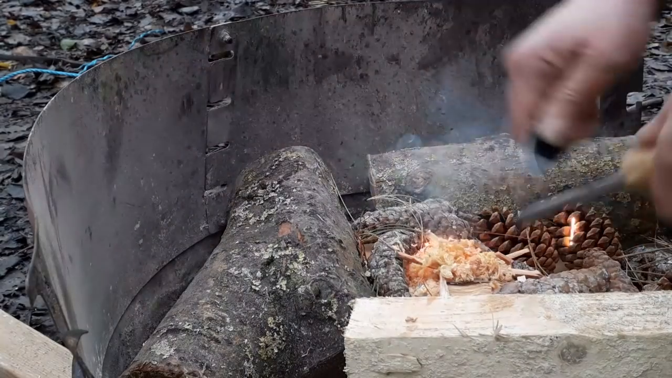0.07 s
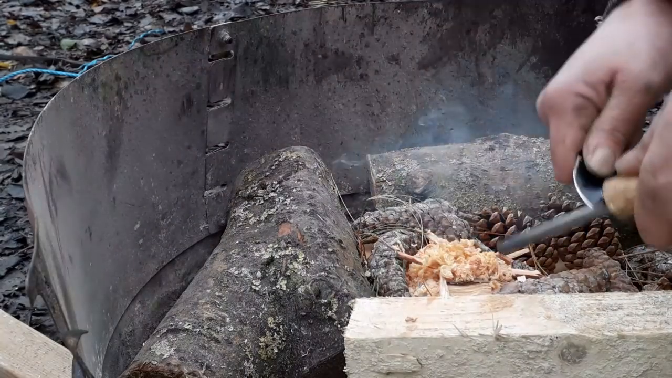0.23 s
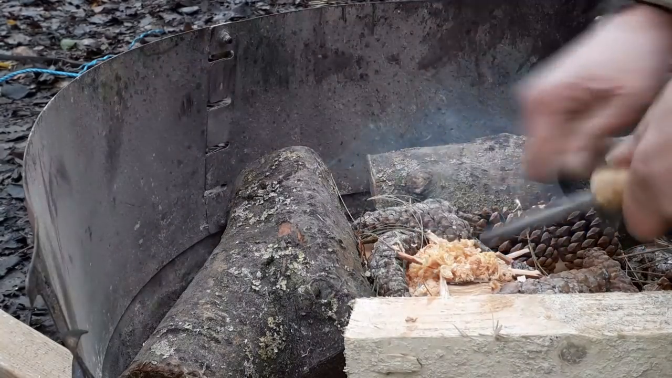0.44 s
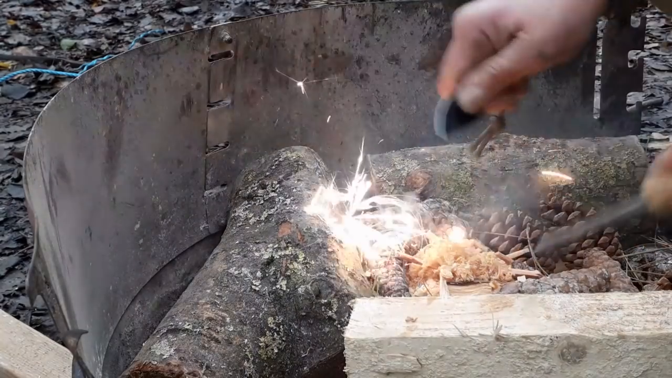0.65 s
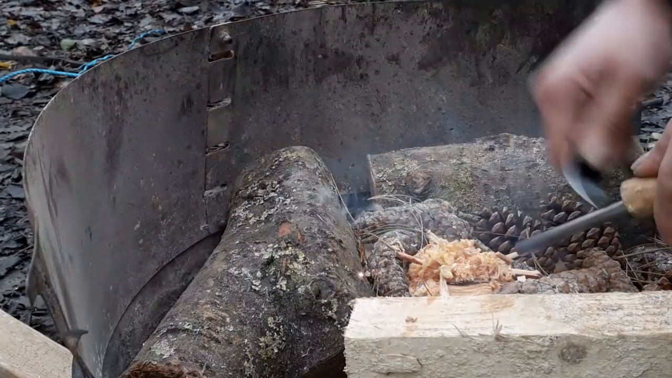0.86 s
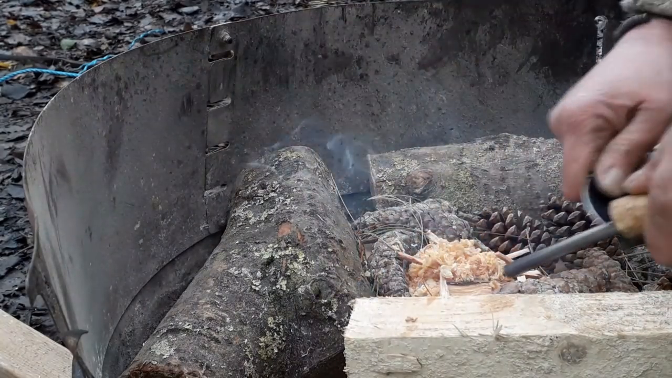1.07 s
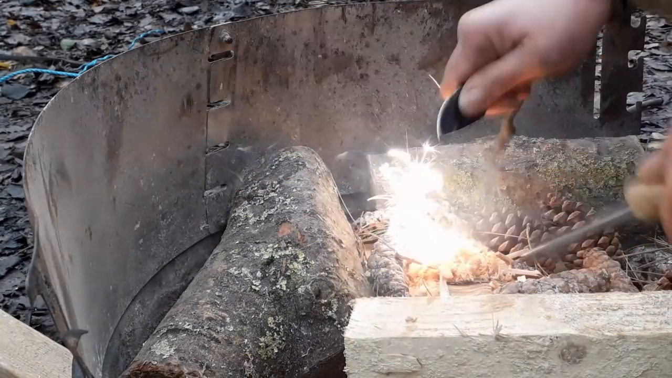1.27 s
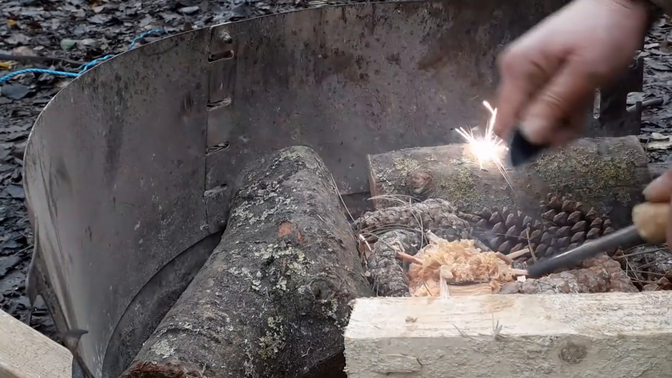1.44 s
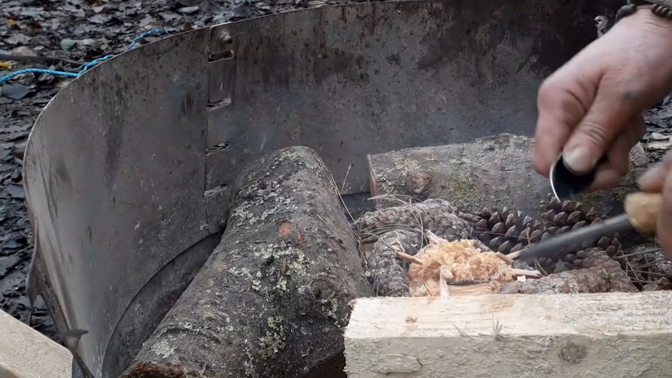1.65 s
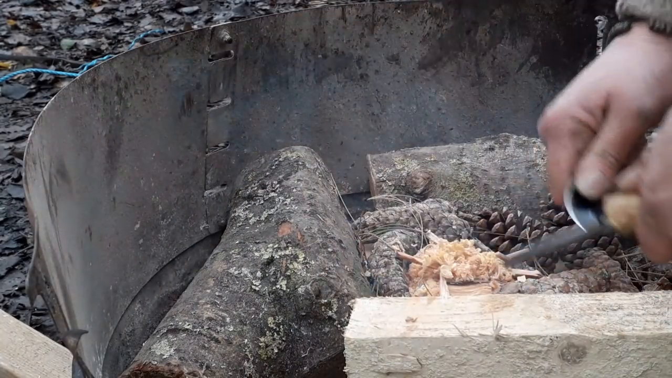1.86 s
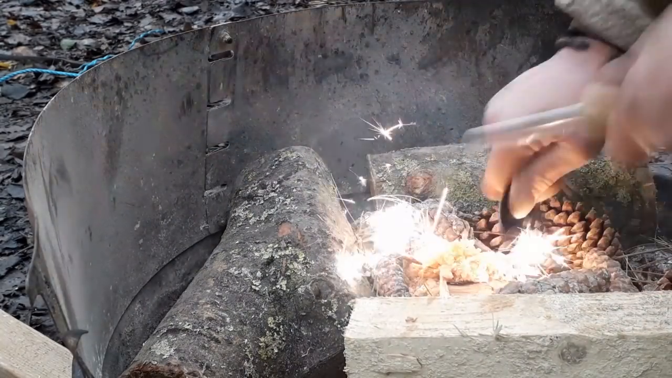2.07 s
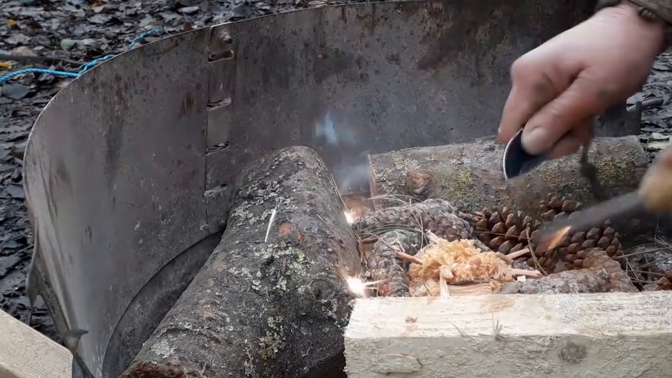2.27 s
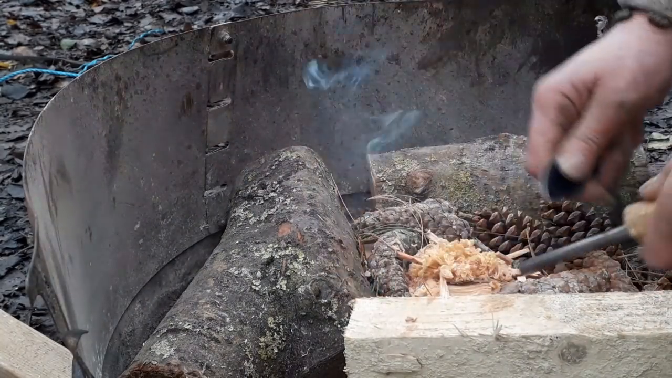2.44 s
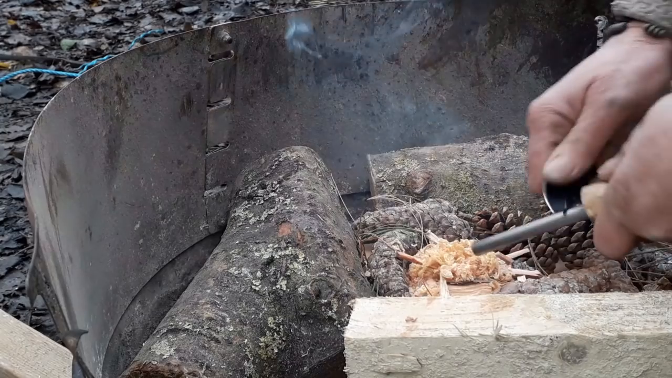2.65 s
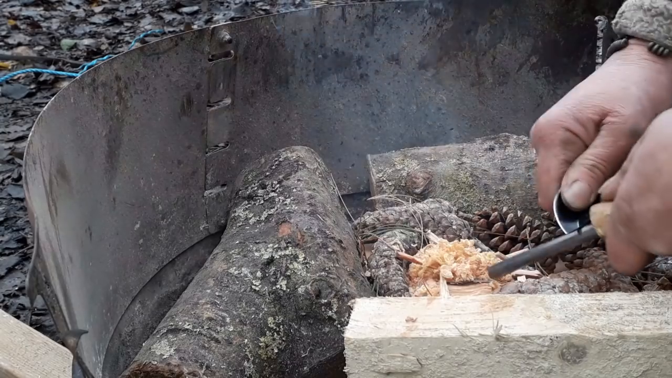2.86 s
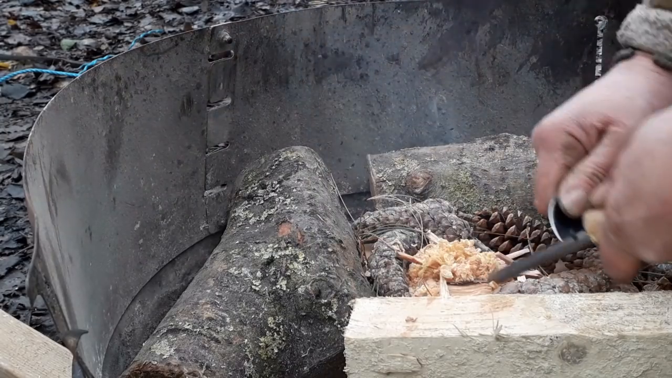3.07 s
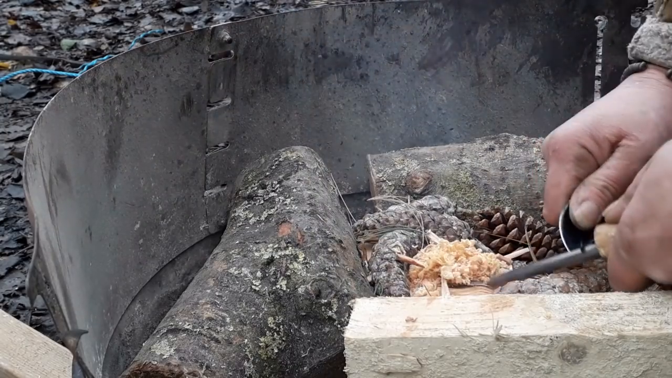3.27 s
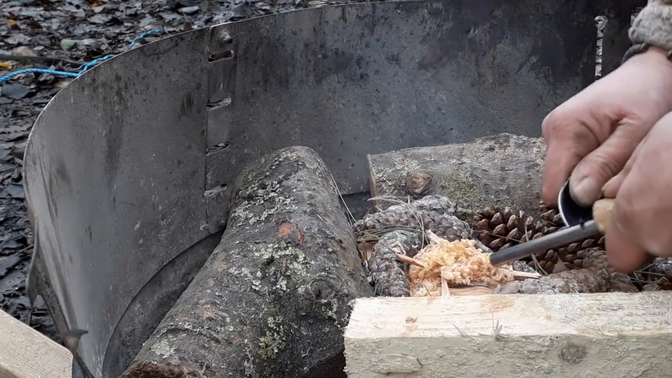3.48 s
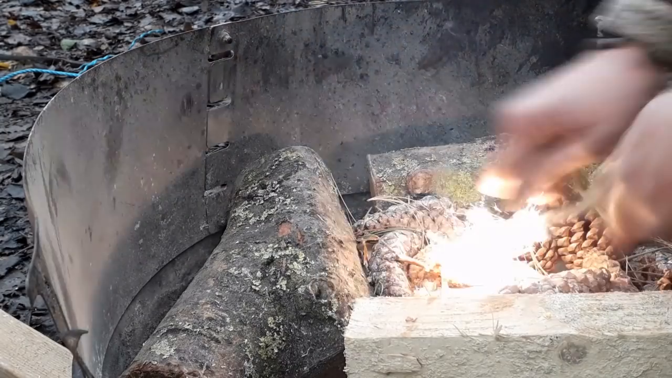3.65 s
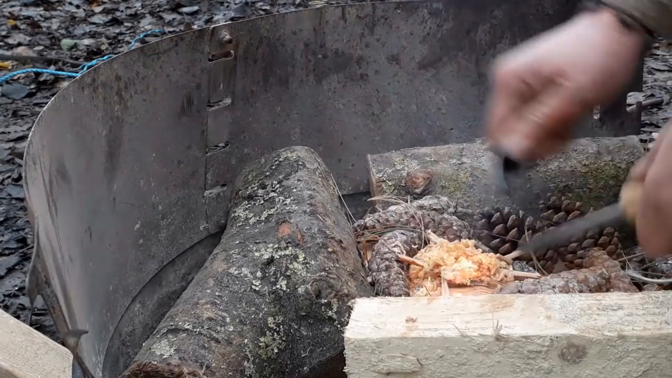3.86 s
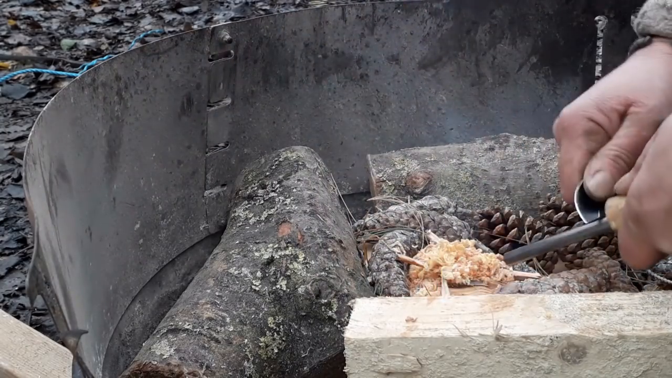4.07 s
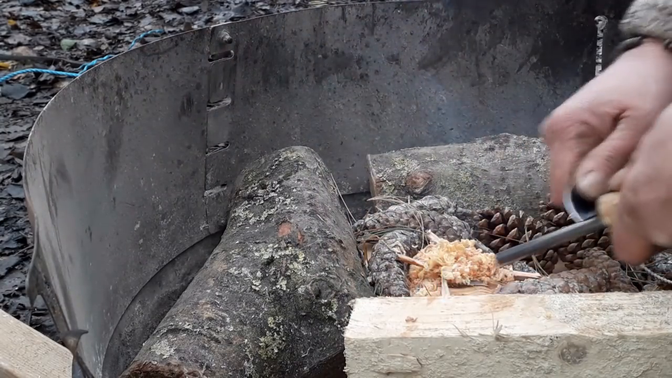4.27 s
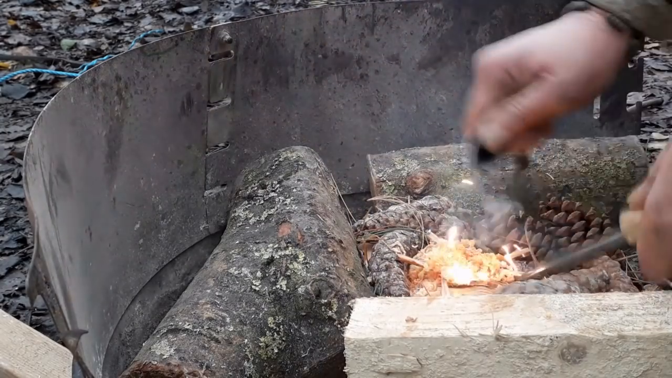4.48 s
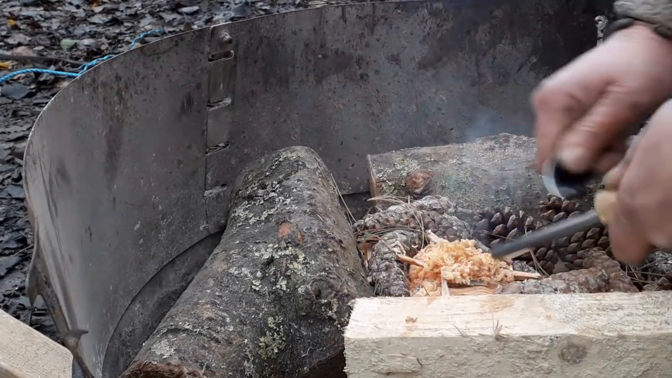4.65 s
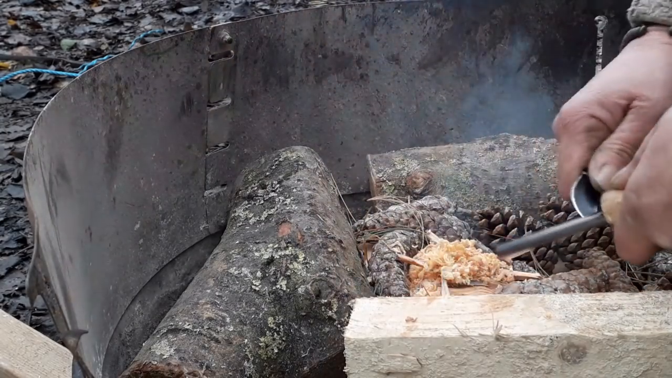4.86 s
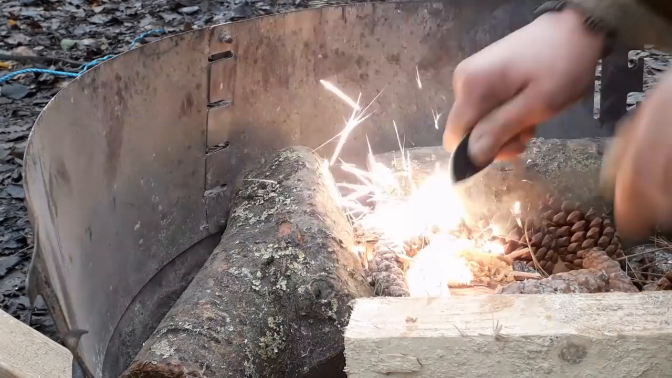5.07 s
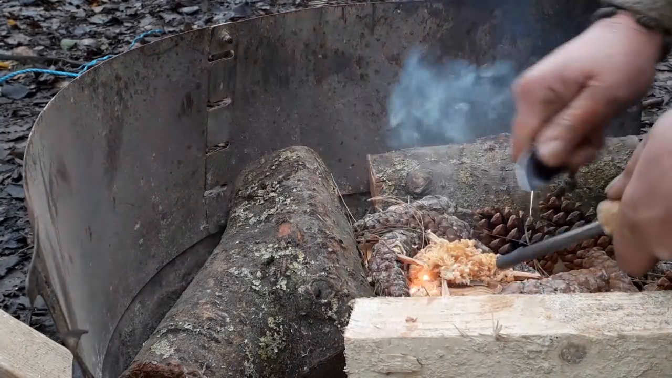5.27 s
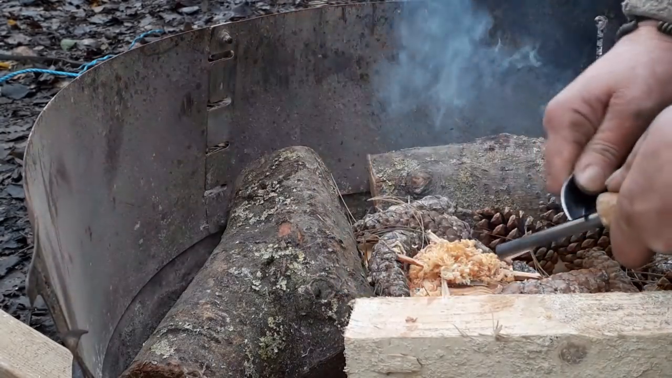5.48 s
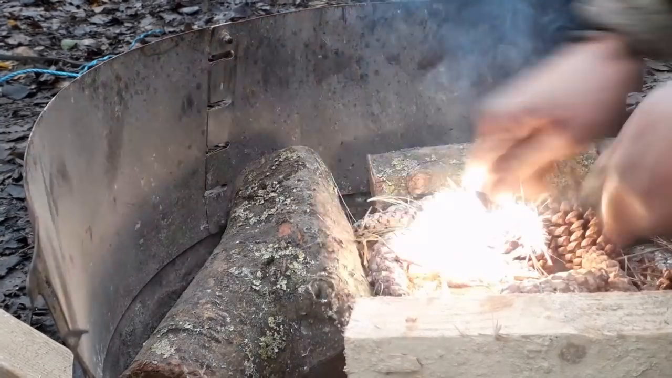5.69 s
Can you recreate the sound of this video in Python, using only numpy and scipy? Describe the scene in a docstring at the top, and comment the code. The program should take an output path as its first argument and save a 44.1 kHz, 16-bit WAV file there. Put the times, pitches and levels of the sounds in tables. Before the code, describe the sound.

Six quick gritty metal scrapes, each flaring into crackling, fizzing sparks, with sharp steel ticks between them and a faint far engine hum outdoors.

```python
"""Outdoors, over tinder in a metal fire bowl, a steel blade is driven down a ferro rod six times.
The blade lands on the rod with ticks: a rough snap of noise plus ringing steel tones.
Each stroke rasps (filtered grit), screeches (two falling tones) and ends with a dull knock of the rod.
The shavings flare, sizzle and pop as swells and short bursts of grit, and embers hiss on.
Behind it lie a steady rush of filtered noise and a far engine, a low note that slowly gains speed."""
import sys
import numpy as np
from scipy import signal
from scipy.fft import rfft, irfft, next_fast_len
from scipy.io import wavfile

SR = 44100
rng = np.random.default_rng(int(sys.argv[2]) if len(sys.argv) > 2 else 0)


def file_out(sig):
    """Save sig as 16-bit WAV at sys.argv[1]."""
    # one column per channel
    cols = np.atleast_2d(sig).T
    # limit, then scale
    lim = np.clip(cols, -1, 1)
    pcm = np.round(lim * 32767).astype(np.int16)
    wavfile.write(sys.argv[1], SR, pcm)


N = 252252
T = np.arange(N) / SR  # time in seconds


def undb(db):
    """Turn decibels into gain."""
    return 10 ** (np.asarray(db) / 20)


def unit(x):
    """Scale a sound to an rms of 1."""
    return x / np.sqrt(np.mean(x ** 2))


def colour(x, points):
    """Filter through (Hz, dB) points without any sound arriving early (minimum phase)."""
    hz, db = np.transpose(points)
    size = next_fast_len(2 * N)
    bin_hz = np.arange(size // 2 + 1) * SR / size + 1
    log_gain = np.log(undb(np.interp(np.log(bin_hz), np.log(hz), db)))
    # folding the cepstrum onto positive times makes the filter causal
    cepstrum = irfft(log_gain, size)
    cepstrum[1:size // 2] *= 2
    cepstrum[size // 2 + 1:] = 0
    response = np.exp(rfft(cepstrum))
    return irfft(rfft(x, size) * response, size)[:N]


def walk(rate):
    """Drift at random with spread 1, along straight lines between `rate` random points a second."""
    knots = rng.standard_normal(8192)
    return unit(np.interp(T * rate, np.arange(len(knots)), knots))


def grit(rate, spread_db):
    """Make dense tiny fractures, `rate` a second, a few much larger than the rest."""
    hits = rng.random(N) < rate / SR
    size = undb(spread_db * np.minimum(rng.exponential(size=N), 4))
    return unit(hits * size * rng.choice([-1, 1], N))


def swell(at, rise, fall):
    """Rise roundly to 1 at the given second, then fall with a longer tail."""
    before, after = np.maximum(at - T, 0), np.maximum(T - at, 0)
    return np.exp(-(before / rise) ** 2 - (after / fall) ** 1.066)


def ringing_down(age, t60):
    """Fade by 60 dB over t60 seconds."""
    return np.exp(-np.log(1000) * age / t60)


def shifting(x, spread_db=1.5, rate=110):
    """The moving contact favours now one band of the rod, now another."""
    hz = np.arange(N // 2 + 1) * SR / N
    centres = [0, 1500, 2300, 3100, 4000, 5000, 6200, 7600, 11000]  # Hz
    spectrum = rfft(x)
    total = np.zeros(N)
    for share in np.eye(len(centres)):
        band = irfft(spectrum * np.interp(hz, centres, share), N)
        total += band * undb(spread_db * walk(rate))
    return unit(total)


# Tone of the outdoor rush. Each row: frequency in Hz, strength in dB per Hz (only the shape counts).
RUSH_SPECTRUM = [(15, -78.5), (25, -38), (46, -22), (65, -7), (80, -8), (110, -7), (200, -8), (300, -12),
                 (400, -15), (520, -21), (890, -10.5), (1150, -13), (1400, -17), (2620, -25.5),
                 (4770, -45.5), (7500, -49), (9750, -68.5), (16500, -100)]
# Rise and fall of the rush. Each row: time in seconds, level in dB (only differences from the median count).
RUSH_LEVEL = [(0.0, -40.5), (0.29, -40.5), (2.15, -41.5), (2.56, -44), (3.86, -41), (5.72, -41.5)]


def outdoors(rush_db=-38.5, hiss_db=-72.5):
    """A broad distant rush of noise wavers a little over a faint even hiss."""
    rush = unit(colour(rng.standard_normal(N), RUSH_SPECTRUM))
    seconds, db = np.transpose(RUSH_LEVEL)
    drift_db = np.interp(T, seconds, db - np.median(db)) + .5 * walk(9.8)
    return rush * undb(rush_db + drift_db) + undb(hiss_db) * rng.standard_normal(N)


# The engine speeds up ever faster: firing rate at first, its gain after one second, bend of the rise.
ENGINE_HZ, ENGINE_GAIN_HZ, ENGINE_BEND = 146.7, .76, 1.8
FAR_TONE_HZ = 354.3
# Loudness of the far engine. Each row: time in seconds, level of its main note in dB.
ENGINE_LEVEL = [(0, -49.5), (1.85, -38), (3.2, -41.5), (4, -43), (5.72, -43.5)]
# A faint far tone that comes and goes. Each row: middle in seconds, half length in seconds, peak level in dB.
FAR_TONE_TIMES = [(.72, .24, -50), (3.61, 0.16, -45), (4.13, 0.15, -46.5), (4.67, 0.17, -47.5)]


def distance():
    """The far engine's firing note has weak octaves below and above; a faint steady tone comes and goes."""
    seconds, db = np.transpose(ENGINE_LEVEL)
    hz = ENGINE_HZ + ENGINE_GAIN_HZ * T ** ENGINE_BEND
    phase = 2 * np.pi * np.cumsum(hz * (1 + 0.0018 * walk(13))) / SR
    note = np.sin(phase) + undb(-15) * np.sin(phase / 2) + undb(-22.5) * np.sin(2 * phase)
    level = undb(np.interp(T, seconds, db) + 0.56 * walk(8))
    engine = np.sqrt(2) * level * note  # the root makes the level an rms value
    presence = np.zeros(N)
    for at, half, tone_db in FAR_TONE_TIMES:
        presence += undb(tone_db) * np.exp(-((T - at) / half) ** 2)
    return engine + presence * np.sin(2 * np.pi * FAR_TONE_HZ * T) * undb(2.0 * walk(20))


# After every stroke the scattered shavings sizzle out; the fizz is relative to the level.
AFTERGLOW_DB, AFTERGLOW_FIZZ_DB = -47.5, -4
AFTERGLOW_DELAY_S, AFTERGLOW_RISE_S, AFTERGLOW_FALL_S = 0.053, .025, 0.081
# Small sparks burst at random once they have flown a while; the rate is for the height of each swell.
STRAY_PER_S, STRAY_DB, STRAY_FIZZ_DB, STRAY_SCATTER_DB = 45, -49, -5, 6.5
STRAY_FLIGHT_S, STRAY_RISE_S, STRAY_FALL_S = .18, 0.031, .08
# Tone of the burning fizz. Each row: frequency in Hz, strength in dB per Hz (only the shape counts).
FIZZ_SPECTRUM = [(2000, -24.5), (5000, 4), (8000, 6.5), (11500, 1), (14000, -2.5), (16000, -2)]
# Tone of a soft puff of hot air. Each row: frequency in Hz, strength in dB per Hz (only the shape counts).
PUFF_SPECTRUM = [(60, -31.5), (180, 2.5), (420, -3.5), (750, -4), (1300, -6), (2500, -9.5), (5000, -17.5)]
# Clumps of shavings flaring up.
# Each row: peak in seconds, level in dB, rise in seconds, fall in seconds, fizz in dB against the level.
FLARE_TIMES = [(0.0126, -27.5, 0.0019, 0.0071, -15), (.035, -48.5, 0.044, 0.055, -7),
               (.659, -31, 0.0087, 0.016, -3.5), (.712, -43, 0.016, .02, -6),
               (1.32, -34, 0.023, 0.011, 1.5), (1.376, -43, .012, 0.015, 3.5),
               (2.134, -37, 0.0069, .016, 6), (2.185, -30.5, 0.03, 0.03, 0.5),
               (2.365, -50.5, 0.012, 0.056, -4.5), (3.796, -31.5, 0.0022, 0.0051, -0.5),
               (3.837, -34, 0.0066, .007, 2), (4.514, -46, 0.0026, 0.011, 13.5),
               (5.142, -38, 0.017, 0.0096, -0.5)]
# Single short bursts of grit: pops and one faint blip.
# Each row: time in seconds, level in dB, fizz in dB against the level.
BURST_TIMES = [(0.1351, -34.5, -18), (.718, -31.5, -13), (1.1682, -36, -19), (1.395, -39, -2),
               (1.521, -33, -17), (2.243, -47, -11), (2.334, -45, 3)]


def sparks(burst_s=0.0011):
    """Flying shavings flare, sputter and sizzle out after each stroke, amid short bursts of grit."""
    body, fizz, burst_body, burst_fizz, flying = np.zeros((5, N))
    for at, db, rise, fall, fizz_db in FLARE_TIMES:
        burn = undb(db) * swell(at, rise, fall)
        body += burn
        fizz += burn * undb(fizz_db)
    for _, hardest, *_ in STROKE_TIMES:
        glow = swell(hardest + AFTERGLOW_DELAY_S, AFTERGLOW_RISE_S, AFTERGLOW_FALL_S)
        burn = undb(AFTERGLOW_DB) * glow
        body = np.hypot(body, burn)  # independent noises add by energy
        fizz = np.hypot(fizz, burn * undb(AFTERGLOW_FIZZ_DB))
        flying += swell(hardest + STRAY_FLIGHT_S, STRAY_RISE_S, STRAY_FALL_S)
    for at, db, fizz_db in BURST_TIMES:
        burst = undb(db) * (T >= at) * np.exp(-np.abs(T - at) / burst_s)
        burst_body += burst
        burst_fizz += burst * undb(fizz_db)

    stray_starts = rng.random(N) < flying * STRAY_PER_S / SR
    stray_db = STRAY_DB + STRAY_SCATTER_DB * np.clip(rng.standard_normal(N), -2, 1)
    # the filter gives every stray the fading tail of a burst; the tiny offset keeps it from stalling near zero
    strays = signal.lfilter([1], [1, -np.exp(-1 / (burst_s * SR))], stray_starts * undb(stray_db) + 1e-18)

    sputter = undb(2.64 * walk(260))
    low_level = body * sputter + burst_body + strays
    high_level = fizz * sputter + burst_fizz + strays * undb(STRAY_FIZZ_DB)
    low = low_level * unit(colour(grit(6000, 1.7), RASP_SPECTRUM))
    high = high_level * unit(colour(grit(6000, 2.2), FIZZ_SPECTRUM))
    hot_air = undb(-7) * body * unit(colour(rng.standard_normal(N), PUFF_SPECTRUM))
    return low + high + hot_air


def crack(age, decay=0.0031, db=3):
    """The rough edge crushes into the rod for a moment: a broadband snap with no bass."""
    burst = rng.standard_normal(len(age)) * (age > 0) * np.exp(-np.abs(age) / decay)
    hz = np.arange(len(age) // 2 + 1) * SR / len(age)
    band = (1 - np.exp(-(hz / 1700) ** 6)) / (1 + (hz / 14000) ** 8)
    return irfft(rfft(burst) * band * undb(db), len(age))


def contact(x, db, favoured_hz, emphasis_db, low_hz, high_hz, favoured_octaves=0.35):
    """One touch of the blade passes a band of the rod's sound, with one favoured region."""
    hz = np.arange(len(x) // 2 + 1) * SR / len(x) + 1
    favour = np.exp(-(np.log2(hz / favoured_hz) / favoured_octaves) ** 2 / 2)
    muting = (1 + (low_hz / hz) ** 16) * (1 + (hz / high_hz) ** 10)
    return irfft(rfft(x) * undb(db + emphasis_db * favour) / np.sqrt(muting), len(x))


# Tones of blade and rod, damped by the hands.
# Each row: frequency in Hz, strength in dB, time to fade by 60 dB in seconds.
STEEL_MODES = [(1834, 6.5, 0.011), (2660, 4, 0.0055), (3430, -1, 0.012), (3860, -4, 0.0046),
               (4470, -2.5, 0.0058), (5300, 4.5, 0.0018), (6120, 4.5, 0.0046), (6800, -6, 0.0026),
               (7420, 0.5, 0.0049), (9710, 0.5, 0.0026), (10680, 7, 0.0038), (12100, -0.5, .003),
               (13700, -21, 0.0019)]
# The blade lands or catches on the rod: the place of contact favours one pitch,
# the grip mutes the lows and a soft touch mutes the highs.
# Each row: time in seconds, rebound gap in seconds, level in dB, favoured pitch in Hz, emphasis in dB,
# muted below in Hz, muted above in Hz, graze in dB against the landing, level of the side noise in dB.
TAP_TIMES = [(.2531, .00092, -20, 4230, 6.5, 3050, 7140, -36, -48),
             (0.9473, 0.00082, -23.5, 5740, 7, 1600, 9800, -27, -38),
             (1.017, .0016, -34.5, 3200, 5.5, 2760, 6500, -7, -36),
             (1.8059, .00083, -24, 5780, 7.5, 1640, 9600, -6, -3),
             (2.104, .0013, -21, 6200, 11.5, 2900, 14100, -1.5, -50),
             (2.636, 0.00097, -29.5, 5750, 18, 1500, 8250, -12, -4),
             (4.073, 0.000928, -19.5, 4360, 9, 1570, 10300, -28, -50),
             (4.7642, 0.00078, -23.5, 3970, 5.5, 1600, 8200, -17.5, 2),
             (5.5383, 0.00085, -23, 5600, 10, 1600, 6100, -29.5, -54)]


def taps():
    """The blade grazes, lands and rebounds twice, setting the steel ringing. Gives middle and side noise."""
    hz, mode_db, t60 = np.transpose(STEEL_MODES)[:, :, None]
    signs = (-1) ** np.arange(len(STEEL_MODES))[:, None]
    gain = signs * undb(mode_db)
    mid, side = np.zeros((2, N))
    for at, gap, *touch, graze_db, side_db in TAP_TIMES:
        near = np.abs(T - at) < .03
        tick = crack(T[near] - at)
        # graze, landing and two rebounds: (delay in seconds, size)
        for lag, size in [(-.0022, undb(graze_db)), (0, 1), (gap, .65), (2.0 * gap, .45)]:
            age = np.maximum(T[near] - at - lag, 0)
            ring = gain * np.sin(2 * np.pi * hz * age) * ringing_down(age, t60)
            tick = tick + size * ring.sum(axis=0)
        mid[near] += contact(tick, *touch)
        side[near] += undb(side_db) * contact(crack(T[near] - at), *touch)
    return mid, side


PUFF_DB, GROWL_DB = -33, 4.1  # hot air of the ignition; gain of the low part of the rasp at full force
# Tone of the rasp. Each row: frequency in Hz, strength in dB per Hz (only the shape counts).
RASP_SPECTRUM = [(700, -52), (1500, -11), (2400, -2), (3600, -1), (5200, 3.5), (6500, -3), (7600, 2.5),
                 (10000, -22), (16000, -22)]
# The six strokes. Each row: start in seconds, hardest moment in seconds, start level in dB,
# hardest level in dB, bend of the rise, fall in seconds, fizz in dB against the rasp,
# chatter delay in seconds, chatter level in dB, knock level in dB.
STROKE_TIMES = [(.509, 0.562, -35.5, -25, 1.35, 0.038, -1.5, 0.049, -30, -46),
                (1.169, 1.234, -46.5, -22, 0.78, 0.015, -2, 0.049, -33, -25),
                (2.065, 2.111, -40, -25, 1.46, 0.0051, 5.5, 0.026, -54, -36),
                (3.688, 3.739, -43, -24, 0.87, 0.017, -2.5, .019, -23, -33),
                (4.381, 4.443, -42.5, -25.5, 0.49, 0.026, -1.5, 0.033, -26, -30),
                (5.017, 5.079, -43, -25, 0.54, 0.027, -1, .018, -23.5, -27.5)]


def scraping(split_hz=3600):
    """The edge tears grains off the rod harder and harder; they ignite with a fizz and a puff of hot air."""
    rasp, growl, fizz, puff = np.zeros((4, N))
    for start, hardest, start_db, top_db, bend, fall, fizz_db, *_ in STROKE_TIMES:
        travel = np.clip((T - start) / (hardest - start), 0, 1)
        bite = np.clip((T - start) / 0.0024 + 1, 0, 1)
        press = undb(start_db + (top_db - start_db) * travel ** bend)
        force = bite * press * swell(hardest, np.inf, fall)
        rasp += force
        growl += force * undb(GROWL_DB) * (force / undb(top_db)) ** .35  # a deeper cut sounds lower
        alight = np.clip((T - start) / 0.027 + .2, 0, 1)  # the first grains take a moment to catch fire
        fizz += force * undb(fizz_db) * alight
        puff += undb(PUFF_DB) * swell(hardest + .003, 0.014, 0.037)
    grains = shifting(colour(grit(6000, 1.5), RASP_SPECTRUM))
    hz = np.arange(N // 2 + 1) * SR / N
    coarse = irfft(rfft(grains) / (1 + (hz / split_hz) ** 6), N)
    fine = grains - coarse
    slip = undb(2 * walk(330))  # the edge catches and slips
    burning = fizz * unit(colour(grit(9000, 4.9), FIZZ_SPECTRUM))
    cut = rasp * fine + growl * coarse + burning
    return slip * cut + puff * unit(colour(rng.standard_normal(N), PUFF_SPECTRUM))


# The screech sinks from its pitch at the stroke's start towards its lowest (glide in stroke lengths).
CHATTER_START_HZ, CHATTER_END_HZ, CHATTER_GLIDE = 4010, 2045, 0.73
CHATTER_RISE_S, CHATTER_FALL_S = .007, 0.033


def chatter(wander=0.058, upper_db=-5):
    """Stick-slip makes the rod screech in two rough bands whose pitch falls as the blade travels."""
    out = np.zeros(N)
    wobble = wander * walk(1800)
    judder = undb(3.2 * walk(170))
    scatter = np.cumsum(rng.standard_normal((2, N)), axis=1) * 0.15  # every slip restarts the vibration
    for start, hardest, *_, delay, db, _ in STROKE_TIMES:
        travel = np.maximum(T - start, 0) / (hardest - start)
        hz = CHATTER_END_HZ + (CHATTER_START_HZ - CHATTER_END_HZ) * np.exp(-travel / CHATTER_GLIDE)
        phase = 2 * np.pi * np.cumsum(hz * (1 + wobble)) / SR
        lower = np.sin(phase + scatter[0])
        upper = undb(upper_db) * np.sin(1.75 * phase + scatter[1])
        out += undb(db) * swell(start + delay, CHATTER_RISE_S, CHATTER_FALL_S) * (lower + upper)
    return out * judder


def knocks(knock_hz=763, t60=0.055, detune=0.053):
    """Let go by the blade at each stroke's end, the rod springs back in its handle with a short, dull knock."""
    out = np.zeros(N)
    for _, hardest, *_, knock_db in STROKE_TIMES:
        age = np.maximum(T - hardest, 0)
        hz = knock_hz * (1 + detune * rng.standard_normal())
        out += undb(knock_db) * np.sin(2 * np.pi * hz * age) * ringing_down(age, t60)
    return out * undb(2 * walk(170))


EMBER_DB, EMBER_DELAY_S, EMBER_RISE_S, EMBER_FALL_S = -70.5, .25, .1, 0.33


def embers(centre_hz=7300, width_hz=1100):
    """Hot specks hiss on in the tinder after each stroke: grit through one narrow band."""
    glow = np.zeros(N)
    for _, hardest, *_ in STROKE_TIMES:
        glow += undb(EMBER_DB) * swell(hardest + EMBER_DELAY_S, EMBER_RISE_S, EMBER_FALL_S)
    band = signal.iirpeak(centre_hz, centre_hz / width_hz, SR)
    return glow * unit(signal.lfilter(*band, grit(5000, 1.7)))


# The rod's broad resonances under light rubbing.
# Each row: frequency in Hz, strength in dB per Hz (only the shape counts).
RUB_SPECTRUM = [(1500, -20), (2700, -14), (3100, 4), (3450, 5), (3800, -1), (4400, -3), (5100, -4),
                (5900, -1.5), (6600, -7), (7400, -5), (10000, -17), (16000, -26)]
# The blade slides lightly into place. Each row: middle in seconds, half length in seconds, level in dB.
SLIDE_TIMES = [(0.993, 0.041, -49.5), (1.839, 0.037, -48.5), (2.697, 0.087, -58.5), (3.238, .073, -61),
               (4.167, 0.041, -49), (4.841, .015, -46)]


def slides():
    """The blade rubs along the rod without cutting: softly swelling grit coloured by the rod."""
    touch = np.zeros(N)
    for at, half, db in SLIDE_TIMES:
        touch += undb(db) * np.exp(-((T - at) / half) ** 4)
    return touch * undb(2 * walk(150)) * shifting(colour(grit(3000, 1.4), RUB_SPECTRUM))


def bowl(x, t60=.13, wet_db=-28):
    """The fire bowl throws back a short, thin tail of fading noise."""
    age = T[:SR // 3]
    tail = rng.standard_normal(len(age)) * ringing_down(age, t60) * (age > .002)
    return x + undb(wet_db) * signal.fftconvolve(x, tail / np.linalg.norm(tail))[:N]


def scene():
    """Everything sits in the middle; a faint treble side noise is added, strong in three ticks."""
    ticks, tick_side = taps()
    near = bowl(scraping() + chatter() + knocks() + sparks() + embers() + slides() + ticks)
    turned = undb(-61.0) * np.imag(signal.hilbert(near))  # the near sound turned by a quarter cycle
    side = tick_side + turned + undb(-80.0) * rng.standard_normal(N)
    treble_only = signal.butter(6, 4400, "high", fs=SR, output="sos")
    side = signal.sosfilt(treble_only, side)
    return near + outdoors() + distance() + side * np.array([[1], [-1]])


TOP_HZ = 15700
# Microphone colour, with a notch from its port. Each row: frequency in Hz, gain in dB.
MIC_COLOUR = [(20, -1.5), (6800, 1), (7700, 2), (8500, -8), (9300, -7), (10500, -2), (12000, 3),
              (16000, -0.5)]


def record(dry):
    """The microphone colours the sound and a steep filter cuts off the top."""
    heard = np.array([colour(channel, MIC_COLOUR) for channel in dry])
    top_cut = signal.ellip(10, .2, 80, TOP_HZ, fs=SR, output="sos")
    return signal.sosfilt(top_cut, heard)


dry = scene()
out = record(dry)
file_out(out)
```